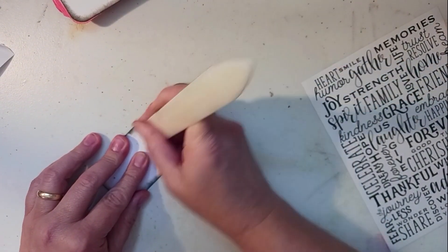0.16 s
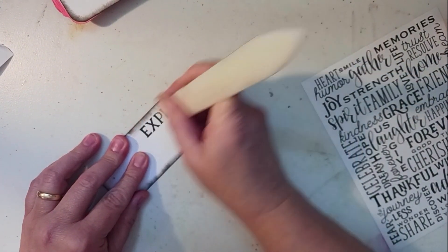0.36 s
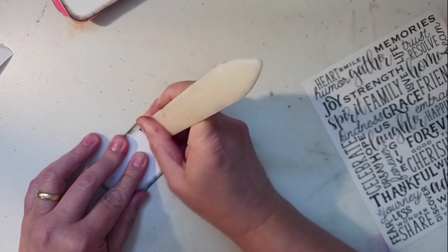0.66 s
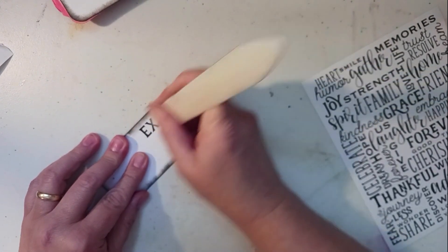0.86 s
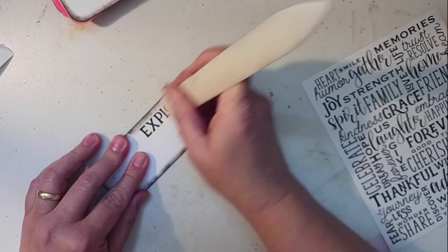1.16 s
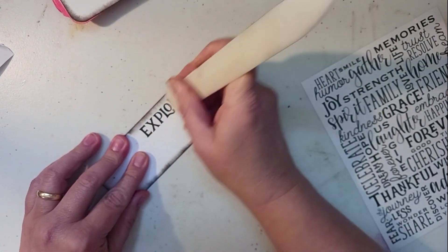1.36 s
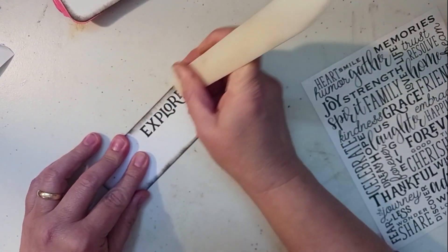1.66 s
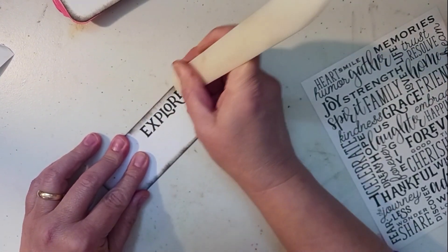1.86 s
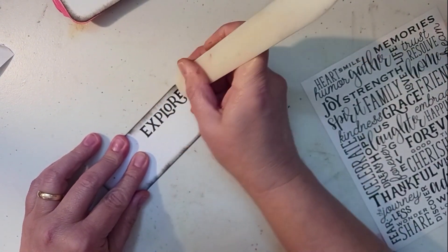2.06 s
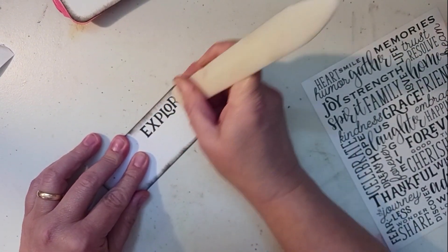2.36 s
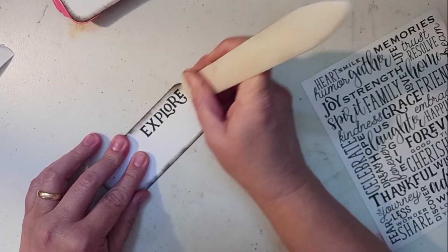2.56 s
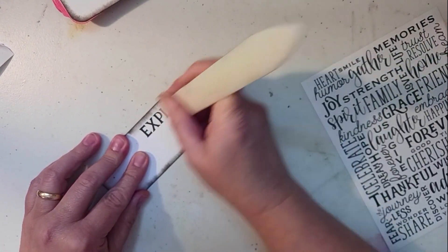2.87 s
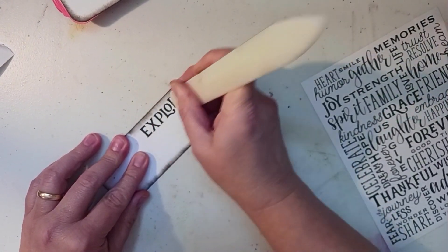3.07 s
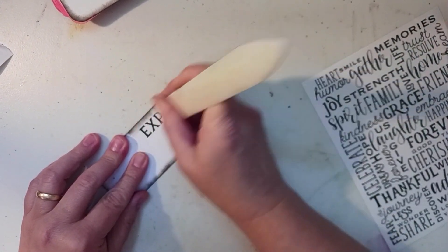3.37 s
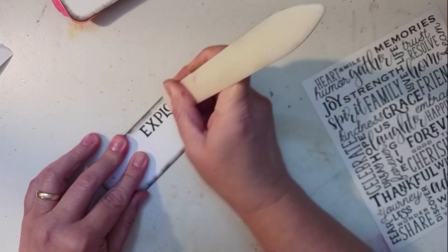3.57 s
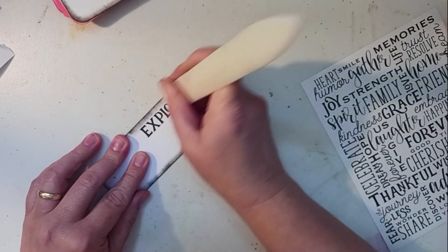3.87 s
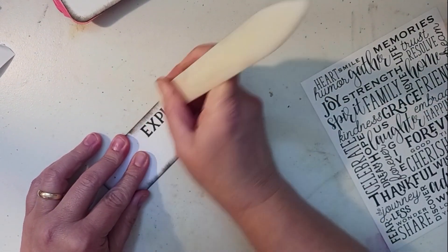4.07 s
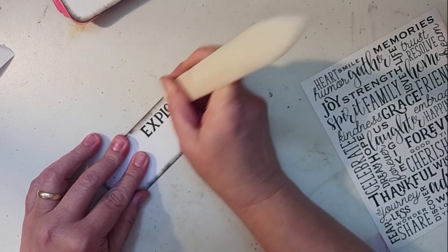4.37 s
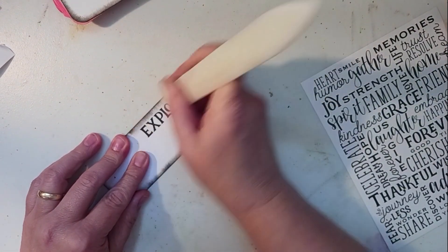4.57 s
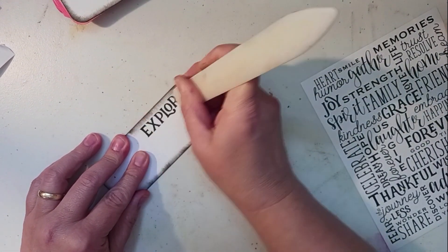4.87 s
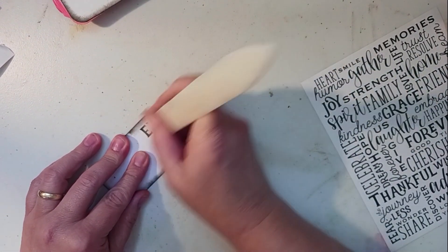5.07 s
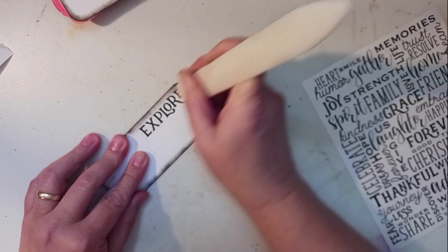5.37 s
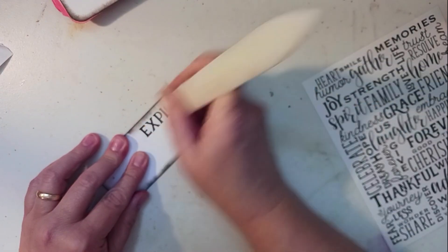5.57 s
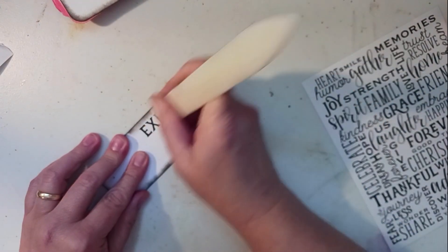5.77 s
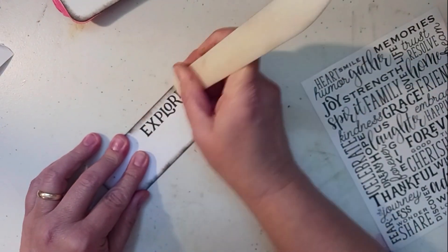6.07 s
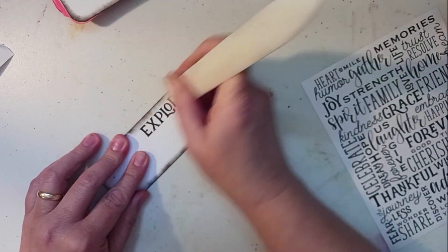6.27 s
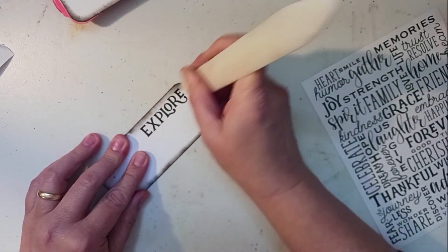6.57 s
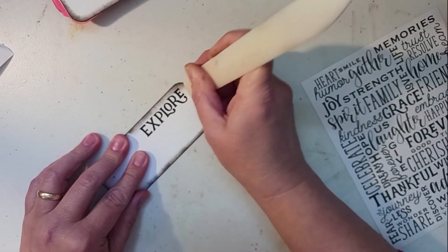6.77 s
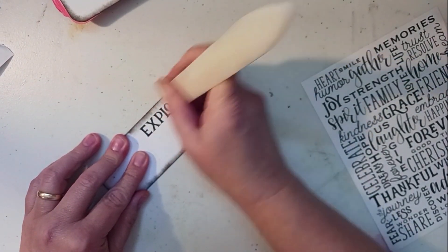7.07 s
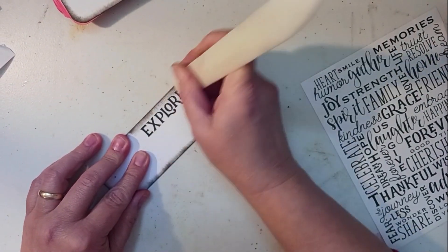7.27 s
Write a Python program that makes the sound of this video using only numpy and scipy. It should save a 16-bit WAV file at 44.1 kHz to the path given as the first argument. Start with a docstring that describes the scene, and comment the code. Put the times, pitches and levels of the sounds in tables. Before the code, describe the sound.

In a quiet room, heard from just above a craft table, a folding tool scrubs quickly to and fro on film laid over paper. The table booms dully under the even strokes while the film rustles and hisses. The hiss thins out early, then returns as the pressure grows, and the rubbing carries on to the end. Now and then the tool bumps over an edge with a soft knock or briefly stutters.

```python
"""Bone folder on a transfer sheet

A craft table indoors, heard from two microphone ports above it; each gets the modes at its own strength.
A hand rubs the folder back and forth, about eight strokes a second. The paper's grain shakes table top
and tool, rustles the film and makes a fine hiss. Now and then the tool knocks over a raised edge or
stutters into a groan, and the film snaps loose. Behind it lie a short, dull room tail and still air."""
import sys
import numpy as np
from scipy import signal
from scipy.fft import rfft, irfft, next_fast_len
from scipy.io import wavfile
from scipy.ndimage import uniform_filter1d

SR = 44100
rng = np.random.default_rng(int(sys.argv[2]) if len(sys.argv) > 2 else 0)


def to_wav(s):
    """Save 16-bit WAV."""
    ch = np.atleast_2d(s).T  # columns
    pcm = np.round(np.clip(ch, -1, 1) * 32767)  # PCM
    wavfile.write(sys.argv[1], SR, pcm.astype(np.int16))


N = 326777

# hand strokes: (start [s], place of hardest pressure [0-1], force [dB], edge bite [dB], rasp [dB])
STROKES = [(-0.04, 0.54, -49.5, 6.5, -70), (0.094, 0.53, -41.5, -1, -68), (0.223, 0.5, -44.0, -1, -63.5),
           (0.349, 0.52, -41.5, 2.5, -70), (0.472, 0.52, -45, 1.5, -61.5), (0.593, 0.5, -43, -4, -69),
           (0.713, 0.46, -51, 2, -66), (0.834, 0.57, -44.0, -6, -71), (0.939, 0.59, -48.5, 1.5, -66),
           (1.058, 0.57, -46, -2, -75), (1.155, 0.55, -49, 2, -74), (1.271, 0.46, -48, -8.5, -86),
           (1.368, 0.59, -52, 1.5, -79), (1.477, 0.35, -43.5, -2.5, -66), (1.578, 0.46, -55.5, 0, -84),
           (1.686, 0.36, -47.5, -5, -92), (1.782, 0.54, -49.5, 1.5, -75), (1.89, 0.47, -46, 0, -96),
           (2.003, 0.57, -47.5, 1, -77), (2.125, 0.34, -49, -2, -86), (2.226, 0.61, -51.5, 4, -81),
           (2.346, 0.27, -46.5, 2.5, -83), (2.452, 0.62, -60.5, 4, -99), (2.581, 0.29, -45.5, -2.5, -95),
           (2.702, 0.59, -56.5, 4, -95), (2.822, 0.51, -46, -1, -65), (2.969, 0.5, -56, -1, -72),
           (3.09, 0.61, -43, 0.5, -71), (3.227, 0.48, -53, -3.5, -87), (3.367, 0.68, -41, -6, -67),
           (3.487, 0.43, -45.5, -0.5, -65.5), (3.622, 0.57, -44, -1.5, -69), (3.746, 0.43, -46.5, 0.5, -75),
           (3.877, 0.65, -37, -3.5, -69), (4.009, 0.41, -41.5, 3, -59), (4.129, 0.63, -37.5, 1, -67),
           (4.254, 0.47, -43.5, 7.5, -59.5), (4.383, 0.57, -42.5, -0.5, -73), (4.511, 0.51, -44, -2, -69),
           (4.654, 0.5, -44.5, 2, -72), (4.79, 0.56, -46.0, -0.5, -71), (4.923, 0.6, -39, -3, -62.5),
           (5.059, 0.48, -43, -2, -69), (5.196, 0.63, -39.5, -2.5, -65.5), (5.335, 0.52, -41, 1, -60.5),
           (5.469, 0.52, -37.5, -2, -66), (5.584, 0.57, -42, 0, -61.5), (5.697, 0.45, -40, 1, -61.5),
           (5.804, 0.55, -46.5, 0.5, -67), (5.918, 0.54, -43, 3, -80), (6.037, 0.57, -46, 0.5, -71),
           (6.156, 0.57, -41.5, -6, -73), (6.266, 0.63, -44.5, 0.5, -75), (6.385, 0.51, -45.5, -2.5, -87),
           (6.492, 0.67, -45.0, -3, -75), (6.612, 0.34, -42, 0, -70), (6.719, 0.68, -48, -1, -79),
           (6.837, 0.37, -41.5, 3, -66.5), (6.957, 0.6, -50.5, 0.5, -76), (7.077, 0.49, -42.5, 3, -73),
           (7.196, 0.58, -44.5, 9, -59.5), (7.315, 0.47, -46.5, 2.5, -79)]
# slow drift at the usual force: (time [s], table boom [dB], film rustle [dB], hiss [dB])
DRIFT = [(0.0, -37.5, -67.0, -52.5), (0.5, -40.5, -65.5, -55.5), (1.15, -40, -61.5, -54.5),
         (1.3, -43, -66.5, -63.5), (2.4, -41.5, -75.5, -69.5), (2.75, -38.5, -73, -69.5),
         (2.9, -39, -63.5, -54), (4.0, -39.5, -70, -56.5), (5.7, -39.5, -67, -54), (6.3, -39.5, -70.5, -55),
         (7.41, -40.5, -71, -55)]
# level change [dB] per: (dB of force, dB of bite, stroke direction, unit of late pressure)
BOOM_LAW, RUSTLE_LAW = (0.495, -0.36, 0.5, 9.5), (1.06, 0.61, 2.5, -9)
HISS_LAW = (0.59, 0.05, 1, -13.5)
LAST_TURN_S, USUAL_FORCE_DB, TOOL_UNDER_SCRAPE_DB = 7.44, -45, 13.5
SPEED_SKEW = 1.037  # above 1 a stroke gathers speed slowly and stops short

def hand_motion():
    """Speed and pressure (0-1) and the layer gains: each stroke starts and ends at rest."""
    start, place, force_db, bite_db, rasp_db = np.transpose(STROKES)
    turns, t = np.append(start, LAST_TURN_S), np.arange(N) / SR
    stroke = np.clip(np.searchsorted(turns, t) - 1, 0, len(start) - 1)
    progress = np.clip((t - turns[stroke]) / np.diff(turns)[stroke], 0, 1)
    speed = np.sin(np.pi * progress ** SPEED_SKEW)
    pressure_skew = np.log(.5) / np.log(place[stroke])
    pressure = np.sin(np.pi * progress ** pressure_skew)
    direction = (-1) ** np.arange(len(start))
    causes = np.array([force_db - USUAL_FORCE_DB, bite_db, direction, place - .5])
    times, *drift_db = np.transpose(DRIFT)
    middle = (turns[1:] + start) / 2
    laws = np.array([BOOM_LAW, RUSTLE_LAW, HISS_LAW])
    boom_db, rustle_db, hiss_db = (np.interp(middle, times, db) + law @ causes
                                   for db, law in zip(drift_db, laws))
    tool_db = force_db + bite_db - TOOL_UNDER_SCRAPE_DB
    levels_db = boom_db, force_db, tool_db, rasp_db, rustle_db, hiss_db
    return speed, pressure, [uniform_filter1d(gain_of(db)[stroke], 700) for db in levels_db]


def rubbing():
    """The paper's grain drives each body; high sounds follow the speed closely, the heavy table loosely."""
    speed, pressure, (boom, scrape, tool, rasp, rustle, hiss) = hand_motion()
    effort = speed * pressure
    return (table_sway(pressure) + table_top(pressure, boom, scrape) + bone_folder(effort, tool)
            + film_rustle(effort, rasp, rustle) + sheet_hiss(speed, hiss))


# the table's low modes, then its board's: (pitch [Hz], width [Hz], left port [dB], right port [dB])
BOOM_MODES = [(101.1, 22.8, -1.5, -0.5), (129.5, 28.8, -0.5, 3.5), (199.6, 74, -9, -5.5),
              (254.3, 68.5, -4.5, -4)]
BOARD_MODES = [(394.4, 53.7, 3.5, -0.5), (548, 30.2, 1, 4), (695.4, 45.6, -4, -0.5),
               (885.4, 54, -11.5, -5.5), (1068, 90, -5.5, -13.5), (1402, 49, -10.5, -12),
               (1517, 52, -16.5, -22.5), (1812, 62, -24, -21)]

def table_top(pressure, boom, scrape):
    """Coarse bumps make the table boom; finer grain scrapes through its board."""
    bumps = grain(400, 2.2, 1.46) * boom
    held = .22 + .7 * pressure  # the lowest modes keep some drive through the turns
    out = ring(BOOM_MODES[:2], bumps * held, steep=2.15)
    out += ring(BOOM_MODES[2:], bumps * (0.032 + 0.8 * pressure ** 1.1), steep=1.63)
    friction = grain(2500, 2.63, 3.22) * scrape * (0.026 + pressure ** 1.5)
    return out + blunt(ring(BOARD_MODES, friction, steep=1), 1710)


# the folder's modes: (pitch [Hz], width [Hz], left port [dB], right port [dB])
TOOL_MODES = [(2326, 345, -2, -0.98), (2551, 206, 4, 0.75)]

def bone_folder(effort, gain):
    """The grain rings the tool itself, most when it moves fast under pressure."""
    friction = grain(5000, 4.5, 4.6) * gain * (0.061 + effort ** 1.22)
    return ring(TOOL_MODES, friction, steep=2.67)


# the film's modes: (pitch [Hz], width [Hz], left port [dB], right port [dB])
FILM_MODES = [(3005, 710, 2.5, 3.5), (3670, 890, -15, -12.5), (3920, 1120, -4, -8), (4727, 700, 6, 0.5),
              (6130, 880, -14.5, -8.5), (7135, 530, -6.5, -1.5), (8560, 750, -1.5, -9)]
# balance of its upper modes: (time [s], relative level [dB])
UPPER_RUSTLE = [(0, -5), (2.3, -7.5), (2.9, -10), (7.41, -9.5)]
FILM_WANDER_DB, TURN_SHARE = 5, .24  # the share keeps the film scraping while the tool turns

def film_rustle(effort, rasp, rustle):
    """The edge catches in coarse slips that ring the film's lowest modes; creases ring the rest."""
    catches = grain(2500, 2.5, FILM_WANDER_DB, wander_bins=8) * rasp * (TURN_SHARE + effort ** 1.8)
    creases = grain(5000, 2.0, FILM_WANDER_DB, wander_bins=8) * rustle * (TURN_SHARE + effort ** 1.06)
    upper_db = np.interp(np.arange(N) / SR, *np.transpose(UPPER_RUSTLE))
    out = ring(FILM_MODES[:2], catches, steep=3.06)
    out += gain_of(-3.5) * ring(FILM_MODES[2:4], creases, steep=2.33)
    return out + gain_of(upper_db) * ring(FILM_MODES[4:], creases, steep=2.12)


# the sheet's treble modes: (pitch [Hz], width [Hz], left port [dB], right port [dB])
SHEET_MODES = [(10030, 790, -18, -29.5), (11560, 790, -2, -13), (12930, 1220, -4, -16.5),
               (14160, 1400, -4, -17.5), (15800, 400, -11, -23)]
FULL_HISS_DB, TOP_FADE_SHARE = -56, 0.5

def sheet_hiss(speed, gain):
    """Gliding over fine grain hisses; as it fades, the top modes lose only a share of the decibels."""
    glide = grain(12000, 1.1, 3.6, wander_bins=10) * (0.021 + np.tanh(1.73 * speed ** 2.6))
    top_gain = gain_of(FULL_HISS_DB) * (gain / gain_of(FULL_HISS_DB)) ** TOP_FADE_SHARE
    lower = gain_of(-2) * ring(SHEET_MODES[:3], glide * gain, steep=1.77)
    top = gain_of(-4.5) * ring(SHEET_MODES[3:], glide * top_gain, steep=2.13)
    return lower - top


# the whole table swaying: (pitch [Hz], width [Hz], left port [dB], right port [dB])
SWAY_MODES = [(64, 56, -4.5, -6.5)]
# the arm's steady rocking, then its lurches: (time [s], level [dB])
ROCKING = [(0, -41.5), (2.9, -49), (5.5, -47.5), (6.3, -57), (7.41, -57)]
LURCHES = [(3.2, -36), (3.46, -44), (3.73, -38), (6.42, -46), (6.67, -44), (6.88, -40.5), (7.08, -44)]
LURCH_HALF_S = 0.05

def table_sway(pressure):
    """The arm rocks the table under the microphone; it lurches when the arm leans in."""
    t = np.arange(N) / SR
    rocking = gain_of(np.interp(t, *np.transpose(ROCKING)))
    lurches = sum(gain_of(db) * np.exp(-((t - at) / LURCH_HALF_S) ** 2) for at, db in LURCHES)
    return ring(SWAY_MODES, grain(300, 2.5) * (rocking + lurches) * (.8 + .2 * pressure), steep=2)


# the tool drops over an edge: (time [s], relative push [dB], relative tick [dB])
KNOCKS = [(0.2, -25.5, -57), (0.231, -27, -49), (0.889, -28.5, -64), (1.4872, -21, -34), (1.687, -35, -57),
          (1.949, -25.5, -66), (2.13, -28.5, -76), (2.301, -30, -59), (2.353, -24.5, -36),
          (2.532, -26, -54.5), (2.588, -24.5, -42), (2.787, -29, -66), (2.83, -22.5, -46.5),
          (3.202, -24, -63), (3.449, -24, -47), (3.72, -21.5, -43), (3.969, -17, -41), (4.187, -52, -36),
          (4.219, -19, -41), (4.45, -25.5, -46), (4.483, -20, -48), (5.481, -28, -57), (5.537, -24.5, -47),
          (5.707, -22.5, -35.5), (5.966, -24, -45.5), (6.21, -27, -66), (6.623, -26.5, -40),
          (6.847, -26.5, -33), (7.088, -30.5, -41.5), (7.133, -30, -39), (7.375, -37, -38.5)]

def knocks():
    """A tap rings board and tool and sets off a dry chatter; the arm's weight then presses the table down."""
    times, push_db, tick_db = np.transpose(KNOCKS)
    push, tick = np.zeros(N), np.zeros(N)
    push[np.round((times + .003) * SR).astype(int)] = gain_of(push_db)
    tick[np.round((times + .0008) * SR).astype(int)] = gain_of(tick_db)
    decay = np.exp(-np.arange(4000) / SR / 0.014)
    chatter = signal.oaconvolve(tick, decay)[:N] * grain(500, 0.85)
    strike = gain_of(-9) * tick + gain_of(-21) * chatter
    weight = -blunt(blunt([push, push], 220), 1700, order=4)
    out = gain_of(25.5) * weight + gain_of(22.5) * ring(BOOM_MODES, weight, steep=1, flip=0.87)
    out += gain_of(20) * ring(BOARD_MODES, weight, steep=1, flip=1)
    out += gain_of(2.5) * ring(TOOL_MODES, strike, steep=2.3)
    return out + gain_of(21) * ring(BOARD_MODES, blunt(strike, 1770, order=5), steep=1, flip=1)


# the tool stutters and one board mode sings: (time [s], length [s], pitch [Hz], level [dB])
GROANS = [(.655, 0.04, 422, -36.5), (.645, 0.054, 530, -41), (3.146, 0.054, 547, -38),
          (3.415, 0.056, 546, -39), (4.988, 0.045, 551.5, -30.5), (5.27, 0.052, 521, -32),
          (4.3, .045, 240, -33), (4.8, .045, 270, -34)]
GROAN_SAG_HZ_PER_S = 500  # the stutter slows as the stroke runs out

def groans():
    """Uneven slips locked to one mode: a wavering tone under a smooth swell, alike at both ports."""
    out = np.zeros(N)
    for start, length, hz, db in GROANS:
        count = round(length * SR)
        waver = unit_rms(uniform_filter1d(rng.standard_normal(count), 150))
        sag_hz = GROAN_SAG_HZ_PER_S * np.linspace(-length, length, count) / 2
        pitch_hz = hz * (1 + 0.02 * waver) - sag_hz
        tone = np.sin(2 * np.pi * np.cumsum(pitch_hz) / SR)
        out[round(start * SR):][:count] += gain_of(db) * tone * np.hanning(count)
    return out


# the film snaps loose: (time [s], relative level [dB], decay time [s])
SNAPS = [(.364, -40, 0.0042), (.372, -55, 0.082), (.436, -41, 0.008)]

def snaps():
    """Bursts of dense crackle ring the film."""
    t, bursts = np.arange(9000) / SR, np.zeros((2, N))
    for start, db, decay_s in SNAPS:
        bursts[:, round(start * SR):][:, :len(t)] += gain_of(db) * np.exp(-t / decay_s)
    return gain_of(-9) * ring(FILM_MODES, bursts * grain(4000, 2.7), steep=1.3)


def room_tail(sound):
    """The walls answer with sparse echoes of random sign: a brief dull body and a faint, longer treble."""
    t = np.arange(SR // 3) / SR
    taps = rng.choice([-1., 1.], (2, len(t))) * (rng.random((2, len(t))) < 2000 / SR) * (t > .004)
    dull = signal.lfilter([.1], [1, -.9], taps)
    tail = dull * gain_of(-1 - 60 * t / 0.08) + (taps - dull) * gain_of(-60 * t / 0.25)
    return signal.fftconvolve(sound, tail / np.linalg.norm(tail[0]), axes=1)[:, :N]


# spectrum of the room tone: (frequency [Hz], relative level [dB])
ROOM_TONE = [(30, -21), (100, 11), (400, -20), (1500, -55), (15000, -46)]
ROOM_TONE_DB = -64.5

def room_tone():
    """The still air of the room, mostly a low rumble."""
    shape = gain_of(curve_at(ROOM_TONE, np.fft.rfftfreq(N, 1 / SR)))
    return gain_of(ROOM_TONE_DB) * unit_rms(irfft(rfft(grain(SR, 0)) * shape, N))


# how alike the two ports sound: (frequency [Hz], likeness [0-1])
PORT_LIKENESS = [(60, 0.97), (250, 1), (500, 0.91), (1000, 0.49), (2500, 0.45), (6000, 0.039)]
# how far the left port leads: (frequency [Hz], phase [rad])
PORT_LEAD = [(300, 0.03), (600, 0.9), (860, -0.6), (2580, 1)]

def grain(slips_per_s, spread_db, wander_db=0, wander_bins=4):
    """Random slips of uneven size; the right port shares them in the bass and hears others in the treble."""
    slips = rng.standard_normal((2, N)) * (rng.random((2, N)) < slips_per_s / SR)
    sizes = gain_of(spread_db * np.minimum(rng.exponential(1, (2, N)), 4))
    left, other = rfft(unit_rms(slips * sizes))
    hz = np.fft.rfftfreq(N, 1 / SR)
    likeness, lag = curve_at(PORT_LIKENESS, hz), np.exp(-1j * curve_at(PORT_LEAD, hz))
    right = likeness * lag * left + np.sqrt(1 - likeness ** 2) * other
    # the contact point wanders, so it favours other modes from moment to moment
    spectra = signal.stft(irfft([left, right], N), nperseg=1024, noverlap=768)[2]
    favour = uniform_filter1d(rng.standard_normal(spectra.shape[1:]), wander_bins, axis=0)
    favour = unit_rms(uniform_filter1d(favour, 12, axis=1))
    force = signal.istft(spectra * gain_of(wander_db * favour), nperseg=1024, noverlap=768)[1]
    return unit_rms(force[:, :N])


def ring(modes, force, steep, flip=-1):
    """Force rings modes, alternating in sign unless struck at one spot (flip > 0); steep sharpens them."""
    size = next_fast_len(N + SR // 2)
    hz, response = np.fft.rfftfreq(size, 1 / SR), 0
    for k, (mode_hz, width, left_db, right_db) in enumerate(modes):
        peak = 1j * hz * width / (mode_hz ** 2 - hz ** 2 + 1j * hz * width)
        response = response + flip ** k * gain_of([[left_db], [right_db]]) * peak ** steep
    response /= np.sqrt(np.mean(abs(response.mean(0)) ** 2))  # white force keeps its mean power
    return irfft(rfft(force, size) * response, size)[:, :N]


def blunt(force, contact_hz, order=2):
    """The rounded tip cannot pass force changes faster than its contact time."""
    return signal.sosfilt(signal.butter(order, contact_hz, fs=SR, output="sos"), force)


def gain_of(db):
    """Decibels to a factor."""
    return 10 ** (np.asarray(db) / 20)


def unit_rms(x):
    """Scales to rms 1."""
    return x / np.sqrt(np.mean(x ** 2) + 1e-20)


def curve_at(points, hz):
    """Reads a table along a logarithmic frequency axis."""
    point_hz, value = np.transpose(points)
    return np.interp(np.log(hz + 1), np.log(point_hz + 1), value)


def scene():
    """The work on the table up front, the walls well below it, room tone behind."""
    table = rubbing() + knocks() + groans() + snaps()
    return table + gain_of(-12.5) * room_tail(table) + room_tone()


LOW_CUT_HZ, HIGH_CUT_HZ = 45, 15740

def record(dry):
    """The microphone above the table drops the deepest bass; a steep band limit trims the top."""
    dry = signal.sosfilt(signal.butter(3, LOW_CUT_HZ, "high", fs=SR, output="sos"), dry)
    band_limit = signal.firwin(1023, HIGH_CUT_HZ, window=("kaiser", 9), fs=SR)
    return signal.oaconvolve(dry, band_limit[None], "same")


dry = scene()
out = record(dry)
to_wav(out)
```